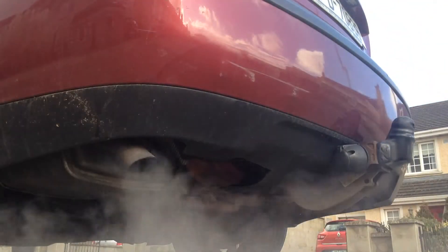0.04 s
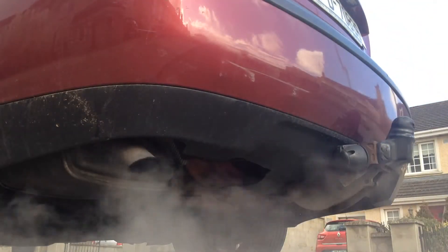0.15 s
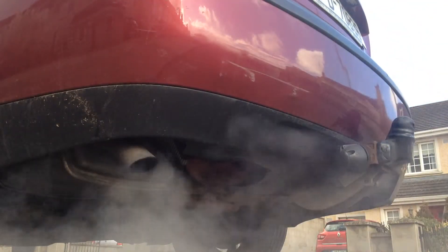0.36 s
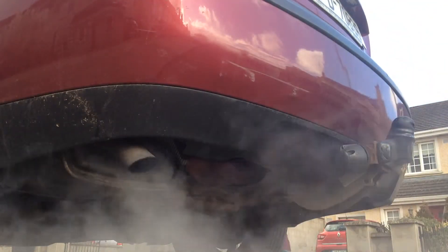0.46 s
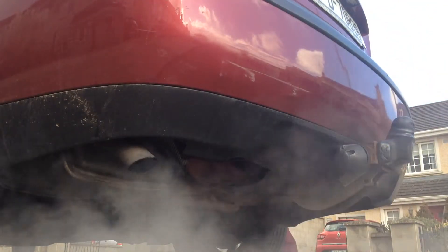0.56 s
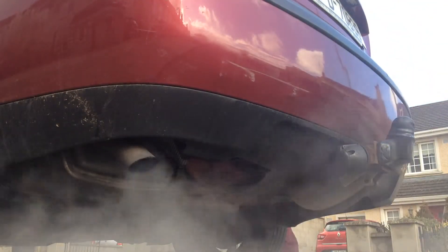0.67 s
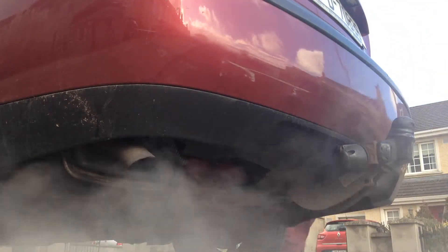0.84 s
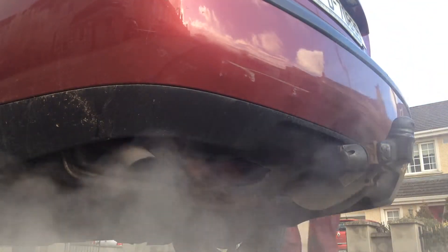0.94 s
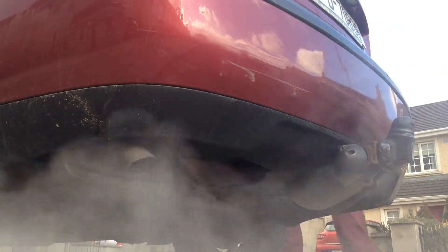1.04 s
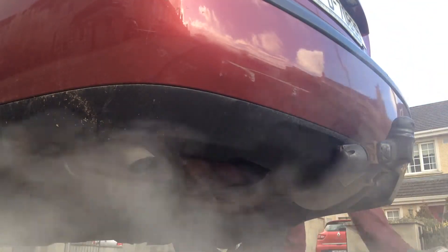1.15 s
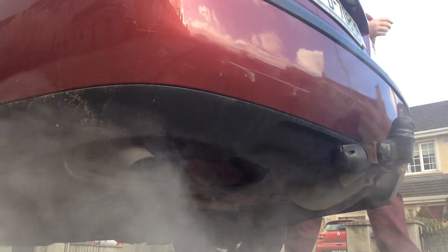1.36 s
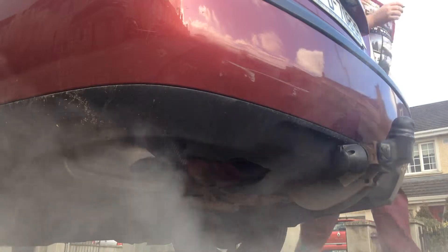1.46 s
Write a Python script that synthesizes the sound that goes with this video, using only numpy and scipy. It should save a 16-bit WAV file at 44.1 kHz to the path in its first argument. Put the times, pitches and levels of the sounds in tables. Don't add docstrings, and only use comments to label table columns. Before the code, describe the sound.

Close behind a car's exhaust on a housing street, the idling engine rumbles and hisses steadily; soon one door of the same car thuds shut with panel boom and trim rattle, then idling continues alone with wet ticks.

```python
import sys
import numpy as np
from scipy import signal
from scipy.fft import rfft, irfft
from scipy.io import wavfile

SR = 44100
rng = np.random.default_rng(int(sys.argv[2]) if len(sys.argv) > 2 else 0)


def undo_db(level):
    steps = np.asarray(level, float) / 20
    return 10 ** steps


def master(y):
    cut = np.clip(np.atleast_2d(y).T, -1, 1)
    pcm = np.round(cut * 32767)
    wavfile.write(sys.argv[1], SR, pcm.astype(np.int16))


N = 66150
TIME = np.arange(N) / SR


def rms_one(x):
    return x / np.sqrt(np.mean(x ** 2) + 1e-20)


def drift(rate):
    r = np.exp(-80 * np.pi * rate / SR)
    slow = signal.lfilter([1], [1, -2 * r, r * r], rng.standard_normal(N // 40 + 2002))
    slow = slow[2000:]
    return np.interp(np.arange(N) / 40, np.arange(len(slow)), rms_one(slow - slow.mean()))


def resonate(x, hz, width_hz):
    r = np.exp(-np.pi * width_hz / SR)
    return signal.lfilter([1, 0, -1], [1, -2 * r * np.cos(2 * np.pi * hz / SR), r * r], x + 1e-18)


def banded_noise(colour, patchy_db):
    hz, db = np.transpose(colour)
    bin_hz = np.arange(N // 2 + 1) * SR / N
    tint = undo_db(np.interp(np.log(bin_hz + 1), np.log(hz), db))
    noise = irfft(rfft(rng.standard_normal((2, N))) * tint, N)
    together = drift(14.0)
    edges = 180 * 2 ** np.arange(0, 6.7, 1 / 3)
    out = 0
    for k, (low, high) in enumerate(zip(edges, edges[1:])):
        sos = signal.butter(2, [low, high], "band", fs=SR, output="sos")
        band = signal.sosfilt(sos, noise[k % 2])
        out = out + undo_db(patchy_db * (.5 * together + drift(10.3))) * band
    return rms_one(out)


def swell(s, half_s):
    return np.exp(-((TIME - s) / half_s) ** 2)


def burst(s, db, hz, half_s):
    return undo_db(db) * swell(s, half_s) * np.cos(2 * np.pi * hz * (TIME - s))


def ringing(modes, s):
    rise_s = 0.0026
    after = np.maximum(TIME - s, 0)
    tones = sum(undo_db(db - 60 * after / t60) * np.sin(2 * np.pi * hz * after) for hz, db, t60 in modes)
    return (1 - np.exp(-after / rise_s)) * tones


# (time [s], rate [firings per s])
FIRING_RATE = [(0, 34.3), (.6, 33.95), (1.0, 33.85), (1.5, 33.55)]


def firings(lag_s):
    first_firing_s = .009
    s, rate = np.transpose(FIRING_RATE)
    count = np.cumsum(np.interp(TIME, s, rate)) / SR
    return count - rate[0] * (first_firing_s + lag_s)


# (time [s], level [dB])
BURN_STRENGTH = [(0, 4), (.2, -1.0), (.5, 1), (.73, 3.5), (.8, -1.5), (.9, 0), (1.0, 1.5), (1.1, 3),
                 (1.22, 1.5), (1.3, 3), (1.4, -1), (1.5, 0)]


def burn_db():
    return np.interp(TIME, *np.transpose(BURN_STRENGTH))


# (multiple of the firing rate, rms level [dB], wander [dB], crest 1 or dip -1)
THROB_TONES = [(1, -44.3, .5, 1), (2, -45.8, 1.2, 1), (4, -52, 1.5, -1), (5, -61, 2.0, -1)]


def throb():
    out = 0
    for multiple, db, wander_db, way in THROB_TONES:
        level_db = db + wander_db * drift(9.2)
        if multiple > 2:
            level_db = level_db + burn_db()
        tone = np.sqrt(2) * np.cos(2 * np.pi * multiple * firings(0))
        out = out + way * undo_db(level_db) * tone
    return out


# (pitch [Hz], width [Hz], rms level [dB])
SILENCER_CHAMBERS = [(14, 14, -67), (52, 18, -59), (86, 22, -60), (115, 26, -54.5), (148, 30, -57.5),
                     (165, 25, -60), (230, 14, -65), (325, 35, -59), (372, 20, -61), (412, 20, -65),
                     (480, 60, -62), (580, 30, -65)]


def puffs():
    spread, jitter_s, turbulence = .6, .003, .8
    at = np.flatnonzero(np.diff(np.floor(firings(0))))
    out = 0
    for hz, width_hz, db in SILENCER_CHAMBERS:
        chance = rng.standard_normal((60, 2))[:len(at)]
        shift = (jitter_s * SR * chance[:, 0]).astype(int)
        kicks = np.zeros(N)
        kicks[np.clip(at + shift, 0, N - 1)] = 1 + spread * chance[:, 1]
        drive = rms_one(kicks) + turbulence * rng.standard_normal(N)
        ring = resonate(resonate(drive, hz, width_hz), hz, 3 * width_hz)
        out = out + undo_db(db) * rms_one(ring)
    return out * undo_db(burn_db())


# (pitch [Hz], level [dB per Hz])
HISS_COLOUR = [(250, -5.5), (500, -3), (1050, -7), (1800, -2), (4000, -10.5), (5600, -8.5), (8000, -21.5),
               (15000, -38)]
# (pitch [Hz], width [Hz], rms level [dB])
SINGING_HOLLOWS = [(870, 30, -62), (1430, 50, -55), (1545, 35, -59), (1735, 35, -59), (2000, 300, -55),
                   (2420, 50, -59), (2750, 170, -60), (3350, 350, -55), (4500, 80, -66), (5085, 45, -65),
                   (5292, 42, -57), (5890, 60, -69), (6550, 50, -72), (10870, 45, -84)]


def hiss():
    hiss_db, hiss_pulse_db, patchy_db, lag_s = -44.5, .7, .8, -0.0013
    sing_db, sing_pulse_db, flicker_db = 2.16, 2.5, 1.3
    pulse = np.cos(2 * np.pi * firings(lag_s))
    out = undo_db(hiss_db + hiss_pulse_db * pulse) * banded_noise(HISS_COLOUR, patchy_db)
    for hz, width_hz, db in SINGING_HOLLOWS:
        gas = rng.standard_normal(N)
        tone = rms_one(resonate(resonate(gas, hz, width_hz), hz, 1.67 * width_hz))
        out += undo_db(db + sing_db + sing_pulse_db * pulse + flicker_db * drift(14.0)) * tone
    return out


# (time [s], peak level [dB], pitch [Hz])
WATER_SPITS = [(.177, -38, 2000), (.207, -36, 2040), (.295, -39, 2050), (.428, -41, 1980),
               (.487, -41, 1980), (.580, -38, 2050), (.607, -39, 2050), (.737, -36, 2050),
               (.797, -41, 2050), (.858, -33, 2060), (.888, -36, 2050), (1.005, -39, 2000),
               (1.110, -38, 2050), (1.140, -35, 2030), (1.169, -34, 2000), (1.200, -36, 2050),
               (1.452, -38, 2000)]


def spits():
    half_s = .0036
    return sum(burst(s, db, hz, half_s) for s, db, hz in WATER_SPITS)


# (time [s], level [dB], half-length [s])
SEAL_PUFFS = [
    (.258, -55, .006),
    (.274, -62, .01),
    (.330, -60, .007),
    (.354, -61, .016),
]


def seal_hiss():
    sos = signal.butter(1, [9000, 15000], "band", fs=SR, output="sos")
    air = signal.sosfilt(sos, rng.standard_normal(N))
    return air * sum(undo_db(db) * swell(s, half_s) for s, db, half_s in SEAL_PUFFS)


# (time [s], level [dB], rise [s], fall [s])
RATTLE_SHAKES = [
    (0.221, -39, 0.008, 0.023),
    (0.247, -32.5, 0.0097, 0.019),
    (0.263, -35.5, 0.0056, 0.01),
    (.279, -37, 0.0072, 0.025),
    (.300, -44.5, 0.0078, 0.017),
    (0.33, -43, 0.0084, 0.013),
    (.350, -39, 0.01, 0.028),
]
# (pitch [Hz], level [dB per Hz])
RATTLE_TINT = [(200, -4), (450, 0), (750, -8), (1200, -9), (2000, -16), (3200, -22), (6000, -42),
               (15000, -65)]


def rattle():
    shake = 0
    for s, db, rise_s, fall_s in RATTLE_SHAKES:
        rise = np.exp(-((TIME - s) / rise_s) ** 2)
        fall = np.exp(-np.maximum(TIME - s, 0) / fall_s)
        shake = shake + undo_db(db) * np.where(TIME < s, rise, fall)
    return shake * banded_noise(RATTLE_TINT, 0.67)


# (pitch [Hz], level [dB], time to fall 60 dB [s])
DOOR_SKIN = [(400, -35.5, 0.1), (510, -31.5, 0.25), (768, -32.5, .14), (900, -31, 0.077), (1042, -29, 0.12),
             (1273, -37, 0.18), (655, -47, 0.15)]


def skin_ring():
    return ringing(DOOR_SKIN, .243)


# (pitch [Hz], level [dB], time to fall 60 dB [s])
BODY_PANELS = [(61.2, -41, .5), (82.4, -35, 0.65), (98.9, -32, 1.14), (166.9, -33.5, 0.45),
               (244.5, -38.5, 0.55), (350, -32, 0.23)]


def panel_boom():
    return ringing(BODY_PANELS, .285)


# (time [s], peak level [dB], pitch [Hz], half-length [s], push 1 or pull -1, in part)
SLAM_BLOWS = [(.2460, -12, 158, 0.0041, -0.98), (0.247, -20, 67, 0.011, -0.68), (.2568, -14, 275, .0045, 1),
              (.2525, -26.5, 350, 0.0026, 0.74), (.2660, -8, 113, 0.0026, 0.38),
              (0.278, -8, 132.4, 0.0057, 0.99), (0.286, -17.5, 57, 0.014, -0.71),
              (0.2923, -10.5, 111, 0.0036, 0.57), (.3000, -17, 191, .004, 0.99),
              (0.319, -11, 81, 0.0075, -0.31), (0.349, -20.5, 115, 0.0033, 0.68),
              (0.3627, -24, 85, 0.0091, 0.96), (0.407, -35, 99, 0.0047, 0.74),
              (0.4405, -29.5, 91, 0.011, -0.8), (0.475, -38, 75.5, 0.019, 0.39)]


def slam_blows():
    return sum(way * burst(s, db, hz, half_s) for s, db, hz, half_s, way in SLAM_BLOWS)


def door():
    return seal_hiss() + rattle() + skin_ring() + panel_boom() + slam_blows()


def scene():
    return (throb() + puffs() + hiss() + spits() + door())[None]


def roll_off(x):
    return signal.sosfilt(signal.butter(12, 15180, fs=SR, output="sos"), x)


def record(dry):
    return roll_off(dry)


dry = scene()
out = record(dry)
master(out)
```